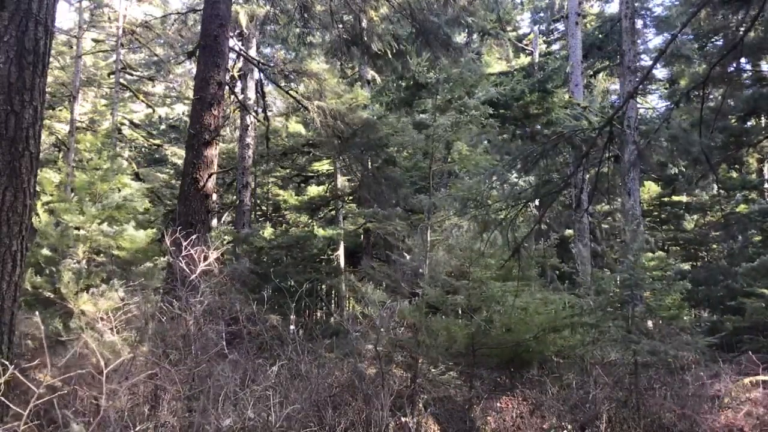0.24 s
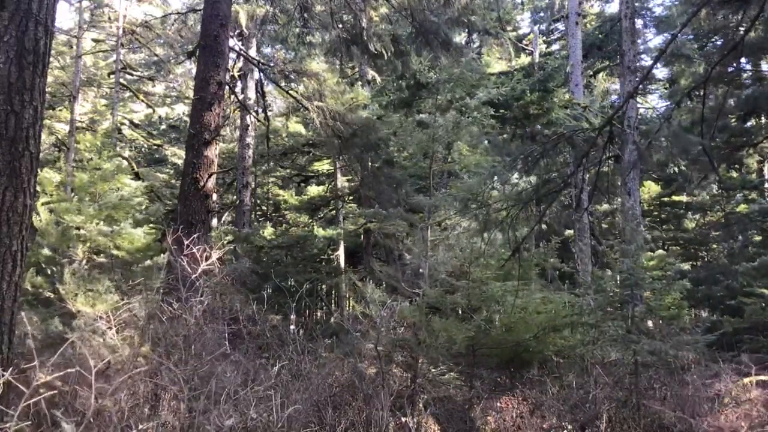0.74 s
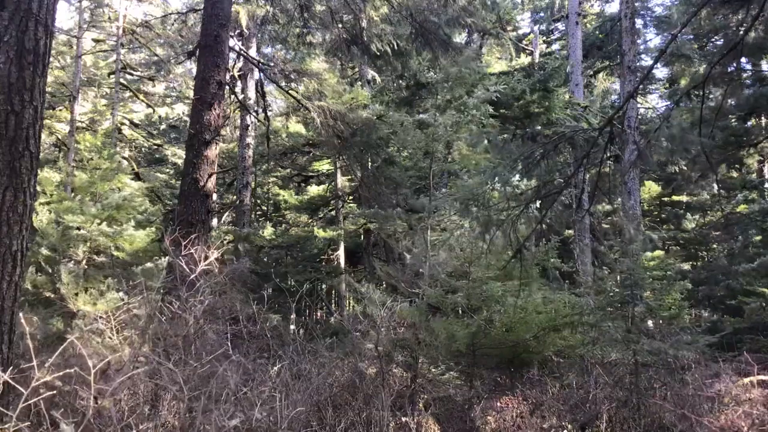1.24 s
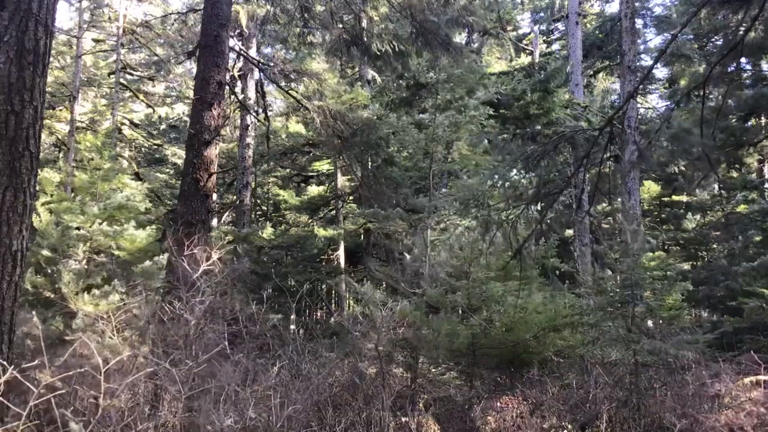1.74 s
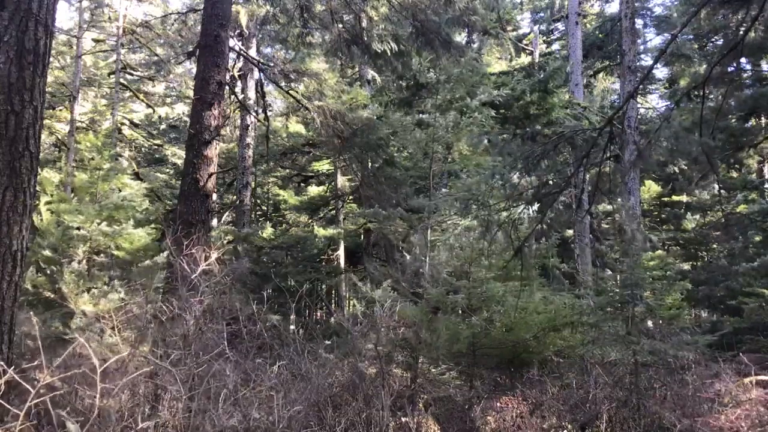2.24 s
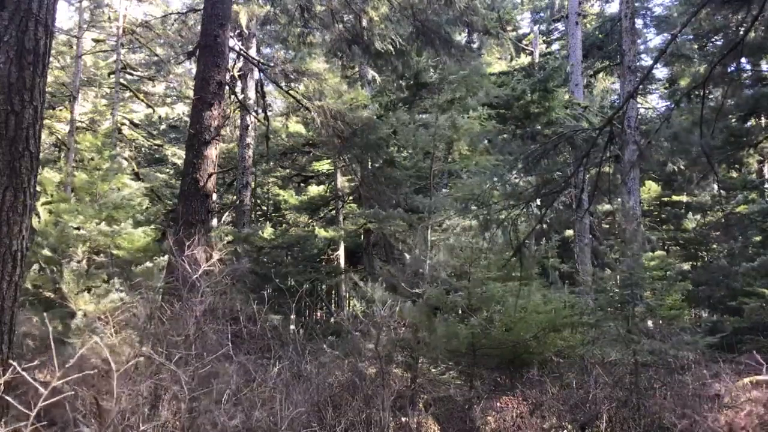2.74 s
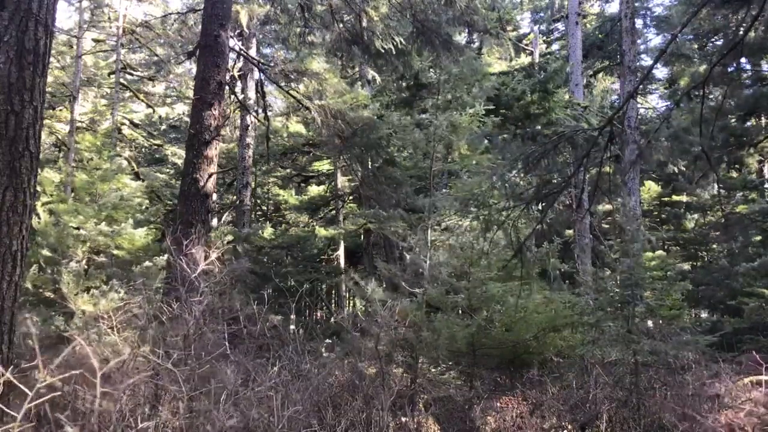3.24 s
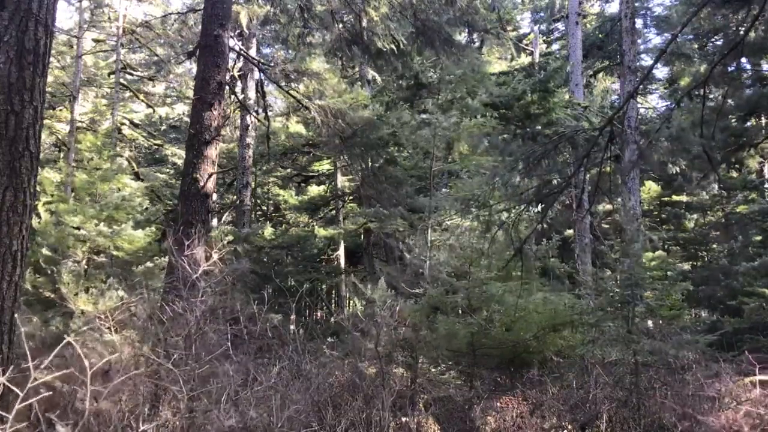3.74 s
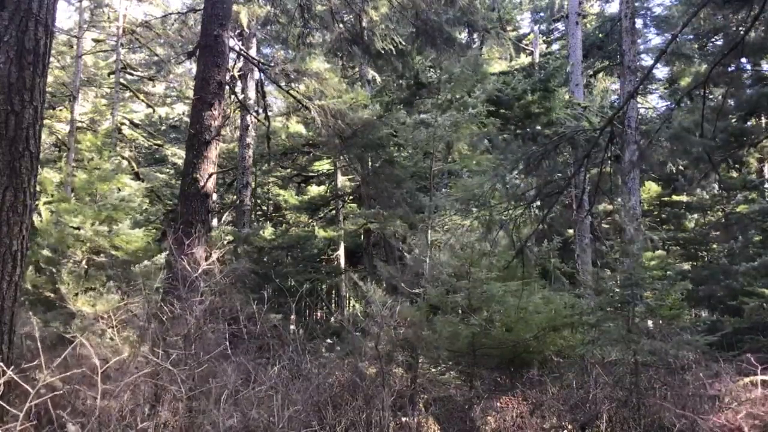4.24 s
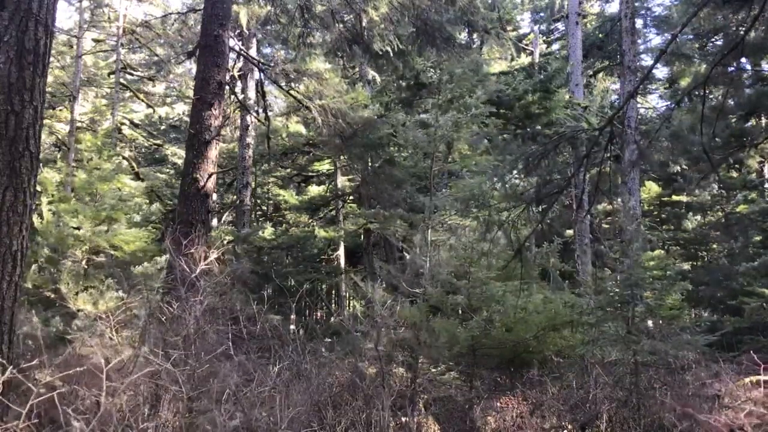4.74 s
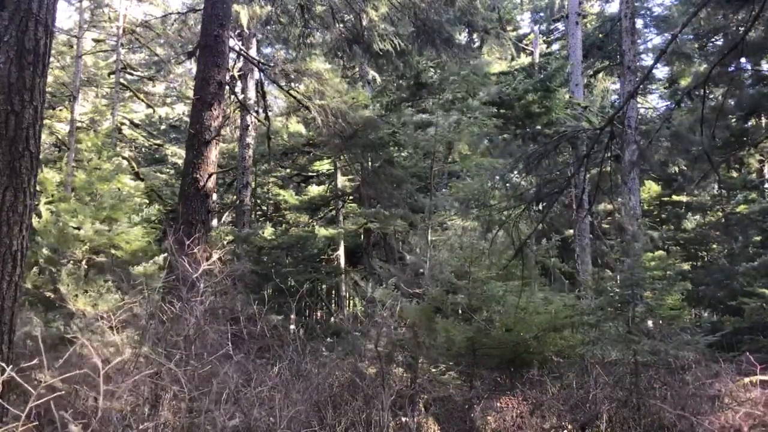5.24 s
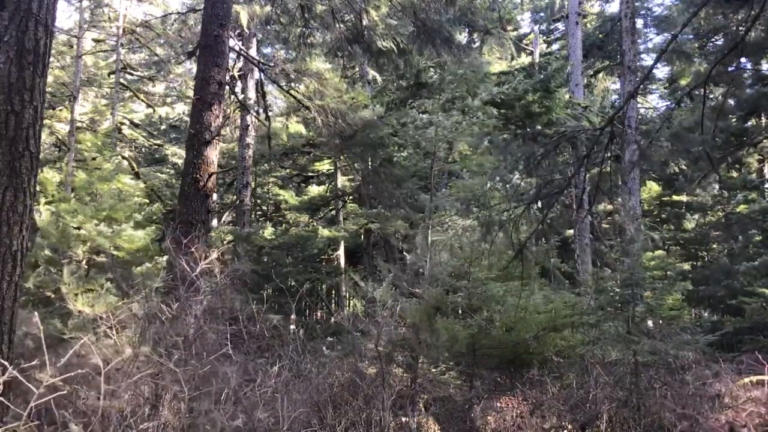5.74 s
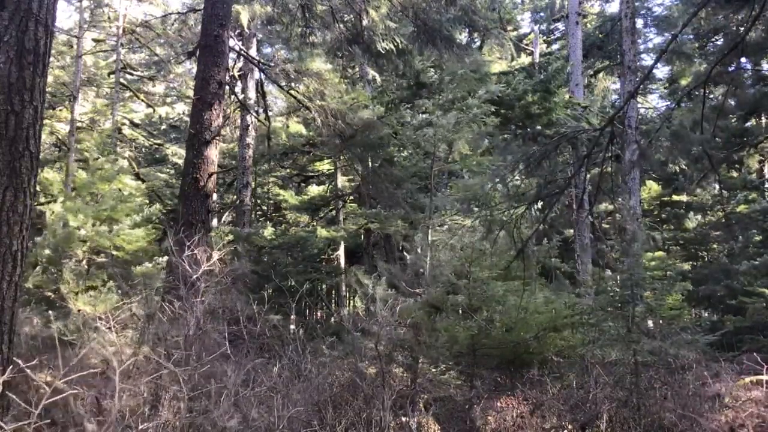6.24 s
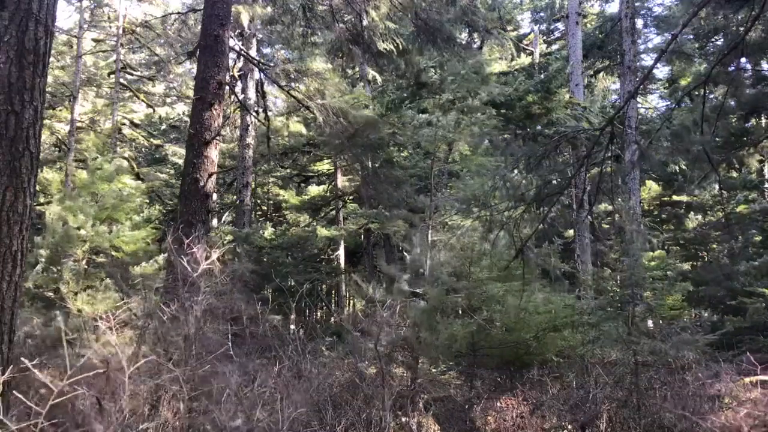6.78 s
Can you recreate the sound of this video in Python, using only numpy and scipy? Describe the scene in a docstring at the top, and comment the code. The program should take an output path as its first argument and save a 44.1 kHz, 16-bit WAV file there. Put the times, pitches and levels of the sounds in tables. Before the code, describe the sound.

Steady wind roars low through a dense conifer forest, with two faint, distant small birds twittering and trilling.

```python
"""A low roar of steady wind in a dense conifer forest, heard from near the ground.
Crowns and trunks make the roar, which swells with the gusts; countless far needles merge into an even hiss.
One small bird twitters in short glides, another trills a rising chip; both are far and blurred
by the trunks. A thin, airy treble lies behind it all."""
import sys
import numpy as np
from scipy import signal
from scipy.fft import rfft, irfft, next_fast_len
from scipy.io import wavfile

SR = 44100
rng = np.random.default_rng(int(sys.argv[2]) if len(sys.argv) > 2 else 0)


def unload_audio(sound):
    """Save the sound as a 16-bit wav file, at the path given as the first command line argument."""
    columns = np.transpose(np.atleast_2d(sound))
    # keep every value between -1 and 1, then stretch to whole-number steps
    steps = np.round(np.clip(columns, -1, 1) * 32767)
    wavfile.write(sys.argv[1], SR, steps.astype(np.int16))


N = 309141

# The ride of the gusts. Each row: time in seconds, roar level in dB, tilt toward its upper half in dB.
GUSTS = [(0, -36.5, 2), (.6, -35.5, 1.1), (1.15, -36, 0.5), (1.7, -35.5, 0.6), (2.4, -32.5, -1.5),
         (2.75, -34, -2), (3.2, -32.5, 0.9), (3.7, -36, -1.2), (4.3, -33.5, 0), (4.7, -35.5, .3),
         (5.1, -37, -1.2), (5.6, -34, -0.2), (6.1, -36, 0.8), (6.6, -34.5, 1.8), (7.01, -35, -2)]
# The tone of the roar. Each row: frequency in Hz, relative level per Hz in dB.
ROAR_SPECTRUM = [(20, -66), (50, -49), (75, -33), (110, -17.5), (160, -4.5), (195, -2), (225, -0.5),
                 (300, -7.5), (350, -9.5), (420, -18.5), (520, -31), (700, -46)]


def crown_roar(pivot_hz=220):
    """Crowns and trunks roar with the gusts; the deep and upper halves trade weight as they pass."""
    roar_db, tilt_db = automation(GUSTS)
    roar = wind_noise(ROAR_SPECTRUM, flicker_db=0.6, rate_hz=1.3)
    deep = signal.sosfiltfilt(signal.butter(2, pivot_hz, fs=SR, output="sos"), roar)
    upper = roar - deep
    return from_db(roar_db) * (from_db(tilt_db) * upper + from_db(-tilt_db) * deep)


# The wind in the needles, slowly easing. Each row: time in seconds, hiss level in dB.
HISS_FADE = [(0.0, -42.5), (7.01, -43.5)]
# The tone of the hiss. Each row: frequency in Hz, relative level per Hz in dB.
HISS_SPECTRUM = [(200, -16), (330, 5), (420, 3.5), (520, 0), (700, -3), (870, -8), (1000, -3), (1130, -0.5),
                 (1400, -6), (1900, -7.5), (2700, -10), (3800, -17.5), (5200, -31.5), (8000, -50)]


def needle_hiss():
    """Wind through countless far needles averages out, so the hiss hardly flickers."""
    hiss_db, = automation(HISS_FADE)
    return from_db(hiss_db) * wind_noise(HISS_SPECTRUM, flicker_db=0.5, rate_hz=2.0)


# The twittered notes. Each row: start in seconds, length in seconds, start pitch in Hz,
# end pitch in Hz, level in dB.
TWITTER_NOTES = [(.912, .014, 6200, 6000, -65), (.945, .022, 6500, 7300, -68), (.96, .02, 4750, 4400, -65),
                 (1.04, .016, 4600, 4350, -61), (2.312, .016, 4700, 4450, -64),
                 (2.34, .022, 4600, 4250, -64), (2.388, .024, 5250, 4300, -61),
                 (2.462, .022, 4900, 4250, -64), (2.503, .018, 5670, 6000, -60),
                 (2.516, .034, 6050, 4750, -63), (2.559, .018, 5600, 4500, -57),
                 (2.578, .028, 4440, 5100, -59.5), (2.615, .047, 5100, 4250, -56),
                 (2.715, .016, 4400, 4650, -61), (2.8, .018, 4450, 4640, -58),
                 (2.876, .014, 5100, 5400, -67), (2.893, .014, 4900, 4600, -66),
                 (3.798, .012, 4450, 4250, -60), (3.816, .014, 5650, 5480, -63),
                 (3.828, .02, 4450, 4900, -61), (3.841, .012, 5420, 5550, -57),
                 (3.85, 0.028, 4850, 4200, -56), (3.856, 0.081, 6330, 5200, -63),
                 (3.93, .05, 4850, 3650, -60), (4.01, .012, 4450, 4250, -64),
                 (4.046, .036, 5550, 4700, -56), (4.126, .02, 5200, 4850, -66),
                 (4.143, 0.015, 4770, 4350, -57), (4.165, .016, 4500, 4200, -58),
                 (4.705, .024, 4500, 3950, -64.5), (4.945, .02, 4600, 4300, -62.5),
                 (5.038, .014, 4600, 4900, -65), (5.415, .025, 4500, 4850, -66),
                 (5.495, .022, 3970, 4650, -62), (5.52, .03, 4600, 4450, -65),
                 (5.556, .028, 4230, 4800, -58), (5.594, .03, 4800, 3960, -59),
                 (5.623, .011, 3940, 4900, -49), (5.633, .016, 5450, 5100, -63),
                 (5.658, .017, 5800, 5370, -64), (5.703, .024, 4600, 4900, -63),
                 (5.759, .012, 5100, 5550, -58), (5.792, .036, 4250, 4950, -61)]


def twittering_bird():
    """A small bird scatters clusters of quick glides, some rising, some falling."""
    return bird_notes(TWITTER_NOTES, flutter_db=2.5)


# The chips of the trill. Each row: start in seconds, level in dB, pitch shift in Hz.
TRILL_CHIPS = [(.59, -65, -30), (.74, -64, 30), (.826, -62.5, 20), (.924, -62, 60), (1.02, -63, 40),
               (1.108, -62.5, -60), (1.205, -63.5, -30), (1.31, -63, 20), (1.407, -63, 60),
               (1.5, -62.5, 30), (1.6, -63, 30), (1.7, -62, 120), (1.8, -62.5, 100), (1.892, -61, 20),
               (1.99, -63.5, 20)]


def trilling_bird(length_s=0.0295, start_hz=4450, end_hz=4800):
    """A small bird repeats one rising chip, each a little louder or softer, higher or lower."""
    chips = [(start_s, length_s, start_hz + shift_hz, end_hz + shift_hz, level_db)
             for start_s, level_db, shift_hz in TRILL_CHIPS]
    return bird_notes(chips, flutter_db=1.5)


def bird_notes(notes, flutter_db, waver_hz=50, arch_share=0.095):
    """Each note is a sine on an arched glide; moving air makes its level and pitch flutter."""
    out = np.zeros(N)
    waver = waver_hz * drift(rate_hz=120)
    for start_s, length_s, start_hz, end_hz, level_db in notes:
        progress = np.linspace(0, 1, round(length_s * SR))
        onset = round(start_s * SR)
        span = slice(onset, onset + len(progress))
        sweep_hz = end_hz - start_hz
        arch_hz = 4 * progress * (1 - progress) * arch_share * abs(sweep_hz)
        pitch_hz = start_hz + sweep_hz * progress + arch_hz + waver[span]
        swell = np.sqrt(np.abs(np.sin(np.pi * progress)))
        out[span] += from_db(level_db) * swell * np.sin(2 * np.pi * np.cumsum(pitch_hz) / SR)
    return out * from_db(flutter_db * drift(rate_hz=90))


def trunk_scatter(direct, t60_s=0.3, wet_db=-5, predelay_s=0.003):
    """Trunks scatter the sound: a dense, dying cloud of echoes follows the direct path."""
    t = np.arange(SR // 2) / SR
    cloud = rng.standard_normal(len(t)) * from_db(-60 * t / t60_s) * (t > predelay_s)
    cloud /= np.sqrt(np.sum(cloud ** 2))
    return direct + from_db(wet_db) * signal.fftconvolve(direct, cloud)[:N]


# The tone of the airy top. Each row: frequency in Hz, relative level per Hz in dB.
AIR_SPECTRUM = [(3000, -16.5), (5200, 0.5), (6500, -1.5), (7500, -5), (9200, -6.5), (10100, -10),
                (12000, -10.5), (16000, -14.5)]


def airy_treble(level_db=-67.5):
    """A thin, steady bed of treble that flickers a little."""
    return from_db(level_db) * wind_noise(AIR_SPECTRUM, flicker_db=0.5, rate_hz=9.7)


def wind_noise(spectrum, flicker_db, rate_hz):
    """Coloured noise in overlapping bands half an octave apart, each swelling on its own; rms 1."""
    size = next_fast_len(N)
    octave = np.log2(np.maximum(np.fft.rfftfreq(size, 1 / SR), 1))
    hz, db = np.transpose(spectrum)
    level_db = np.interp(octave, np.log2(hz), db, left=-200, right=-200)
    coloured = rfft(rng.standard_normal(size)) * from_db(level_db)
    out = np.zeros(N)
    for centre in np.arange(4.5, 15, .5):
        share = np.clip(1 - 2 * abs(octave - centre), 0, 1)  # neighbouring shares add up to one
        band = irfft(coloured * share, size)[:N]
        out += from_db(flicker_db * drift(rate_hz)) * band
    return rms_one(out)


def drift(rate_hz):
    """A smooth random wander of rms 1: noise through two one-pole low-passes at rate_hz."""
    hop, warm_up = 40, 2000
    pole = np.exp(-2 * np.pi * rate_hz * hop / SR)
    noise = rng.standard_normal(N // hop + warm_up + 2)
    wander = signal.lfilter([1], [1, -2 * pole, pole * pole], noise)[warm_up:]
    return np.interp(np.arange(N) / hop, np.arange(len(wander)), rms_one(wander))


def automation(rows):
    """Ramps between timed breakpoints: one curve for each column after the time."""
    times_s, *columns = np.transpose(rows)
    return [np.interp(np.arange(N) / SR, times_s, column) for column in columns]


def from_db(db):
    return 10 ** (np.asarray(db) / 20)


def rms_one(x):
    return x / np.sqrt(np.mean(x ** 2) + 1e-20)


def scene():
    """A mono mix: wind in front, two birds far back among the trunks."""
    birds = twittering_bird() + trilling_bird()
    return (crown_roar() + needle_hiss() + trunk_scatter(birds) + airy_treble())[None]


def record(dry, cutoff_hz=15705):
    """A steep low-pass takes off the very top."""
    low_pass = signal.ellip(16, .3, 70, cutoff_hz, fs=SR, output="sos")
    settled = signal.sosfilt_zi(low_pass)[:, None] * dry[:, :1]  # starts as if already running
    return signal.sosfilt(low_pass, dry, zi=settled)[0]


dry = scene()
out = record(dry)
unload_audio(out)
```